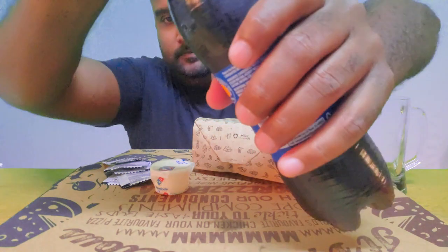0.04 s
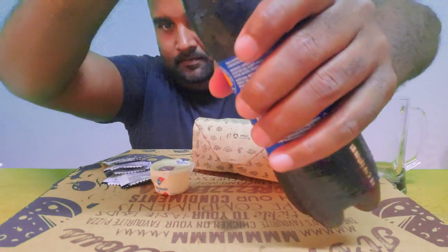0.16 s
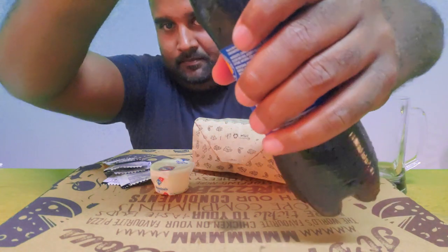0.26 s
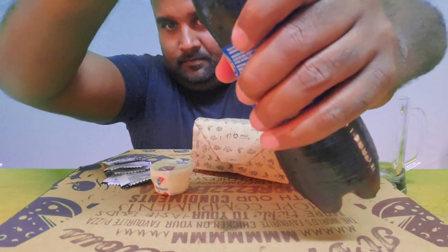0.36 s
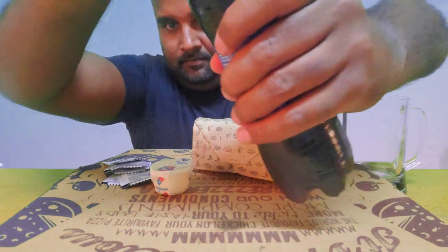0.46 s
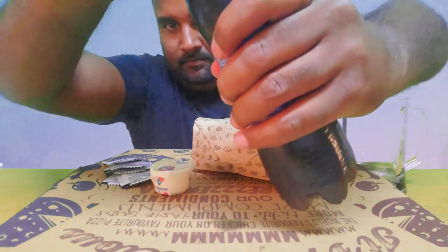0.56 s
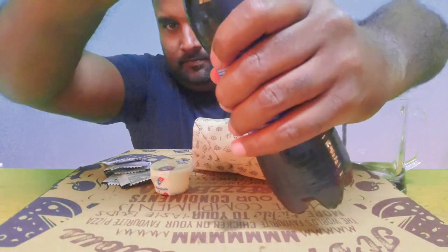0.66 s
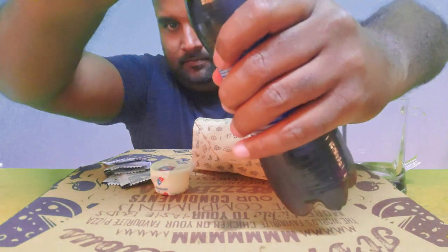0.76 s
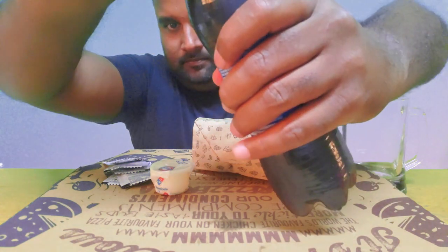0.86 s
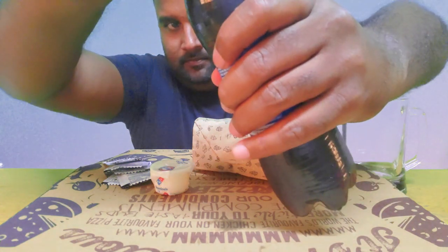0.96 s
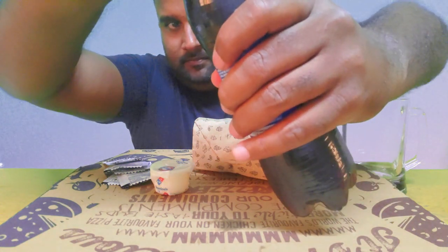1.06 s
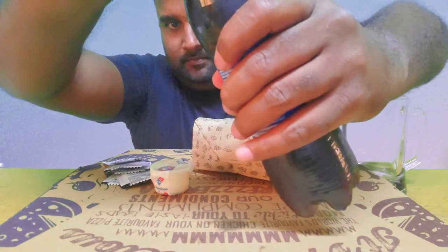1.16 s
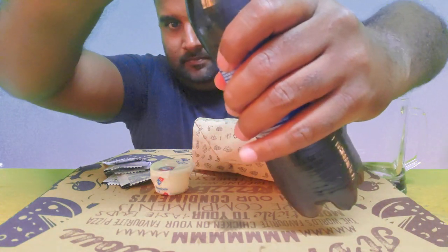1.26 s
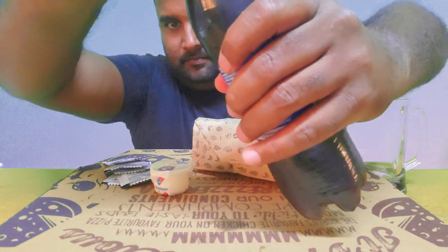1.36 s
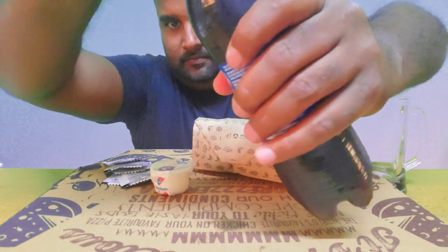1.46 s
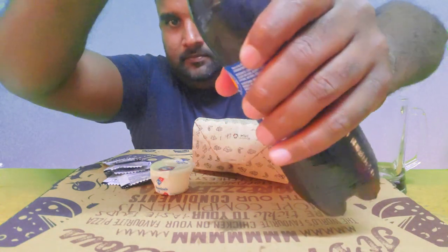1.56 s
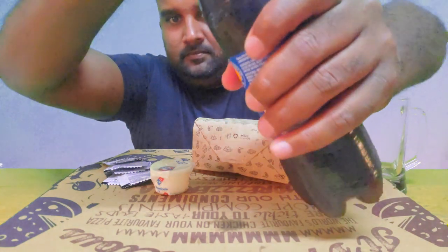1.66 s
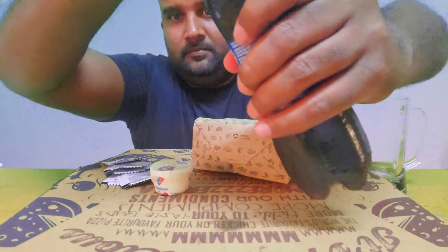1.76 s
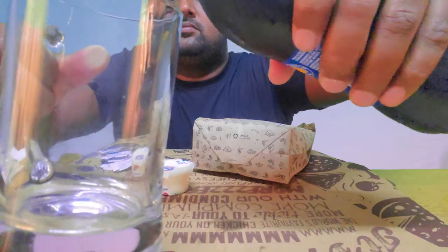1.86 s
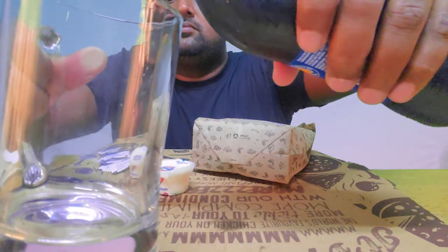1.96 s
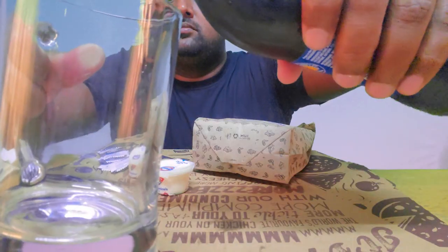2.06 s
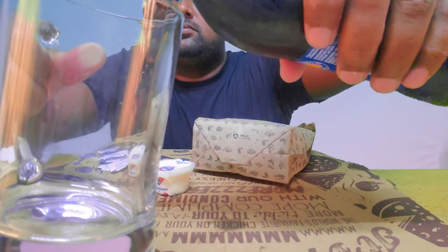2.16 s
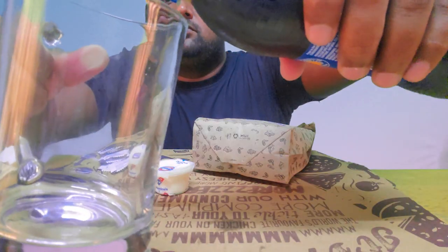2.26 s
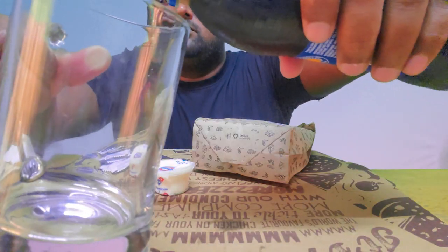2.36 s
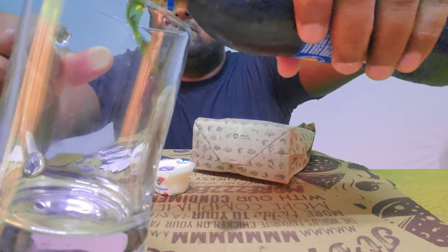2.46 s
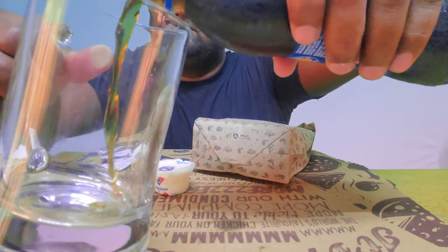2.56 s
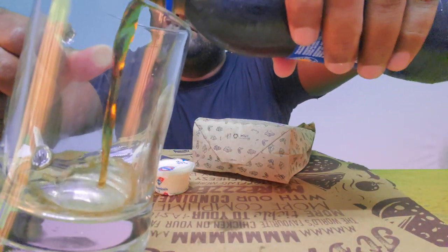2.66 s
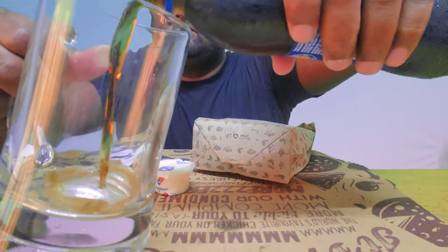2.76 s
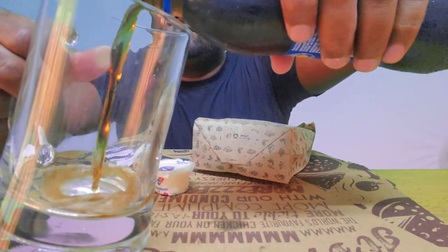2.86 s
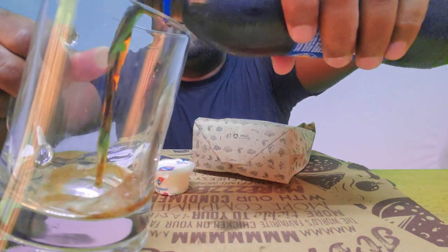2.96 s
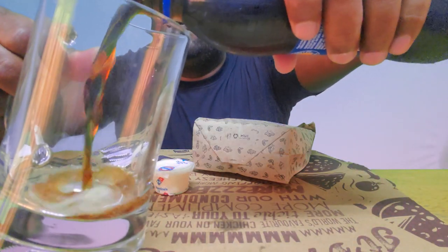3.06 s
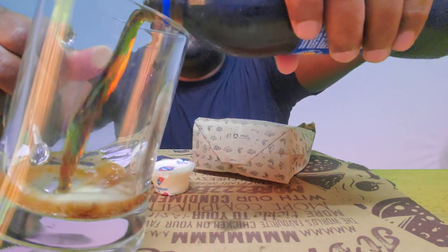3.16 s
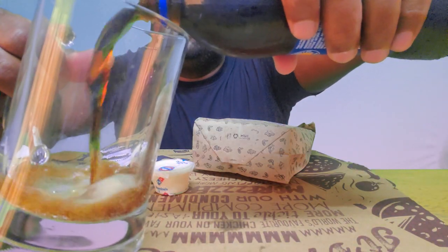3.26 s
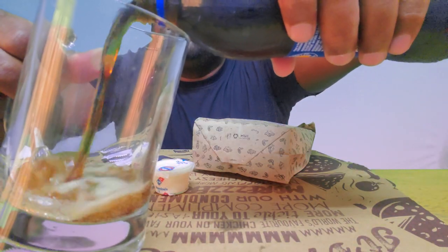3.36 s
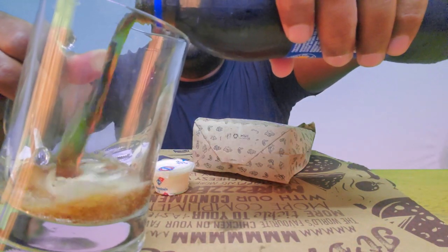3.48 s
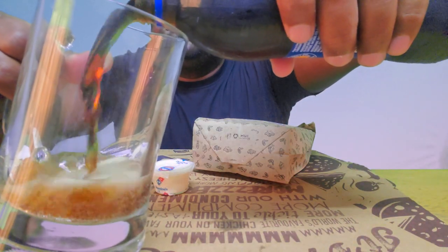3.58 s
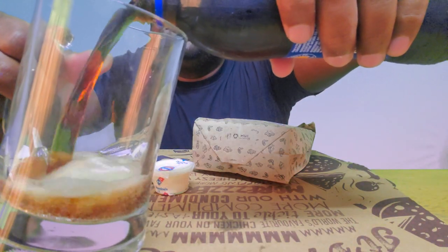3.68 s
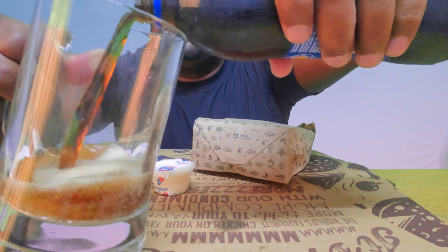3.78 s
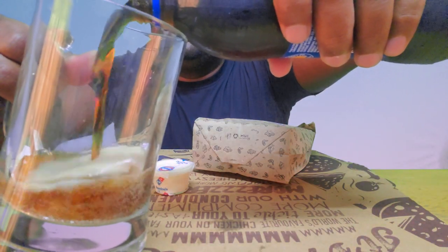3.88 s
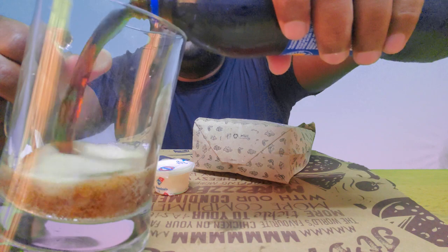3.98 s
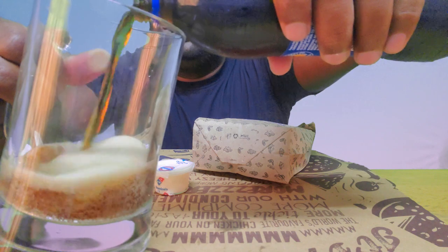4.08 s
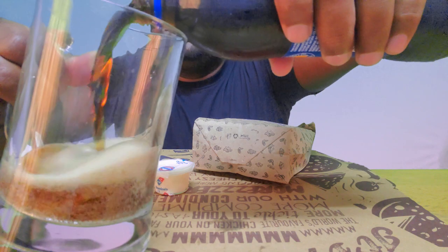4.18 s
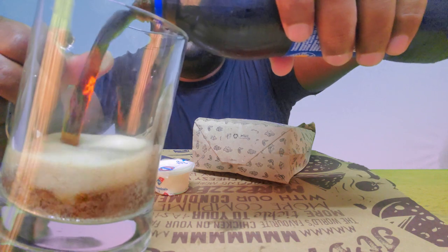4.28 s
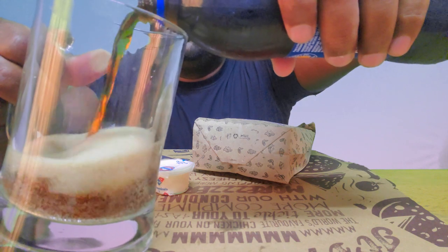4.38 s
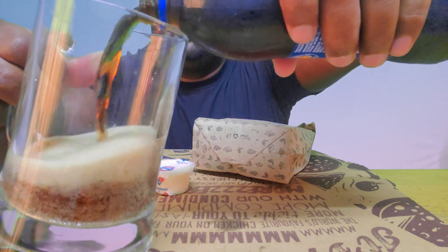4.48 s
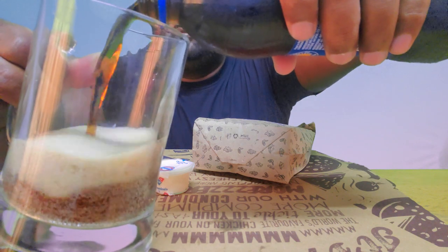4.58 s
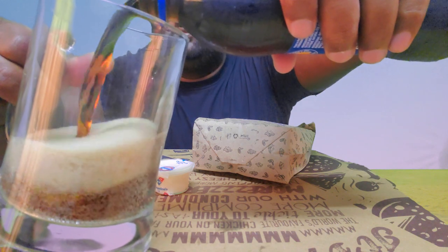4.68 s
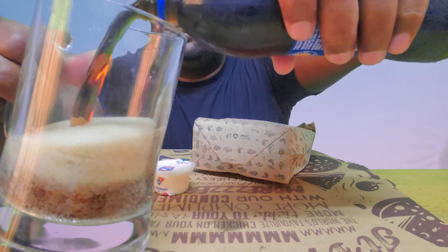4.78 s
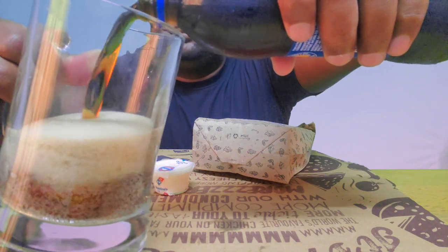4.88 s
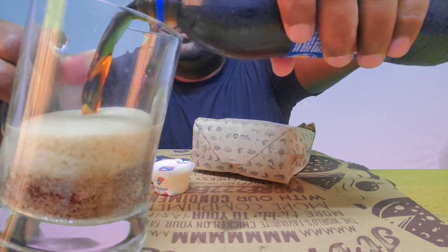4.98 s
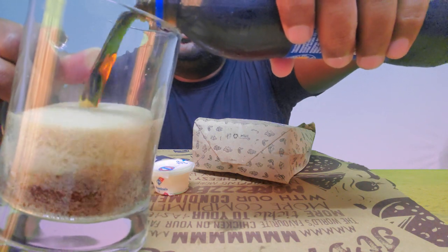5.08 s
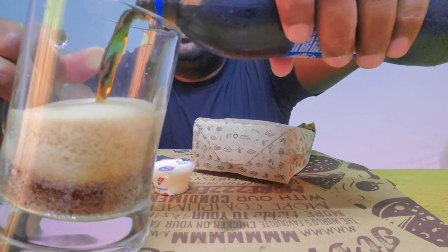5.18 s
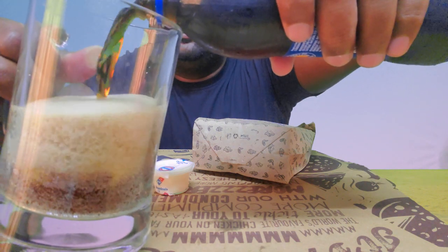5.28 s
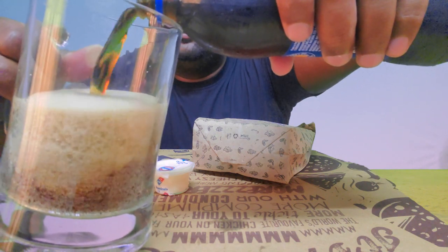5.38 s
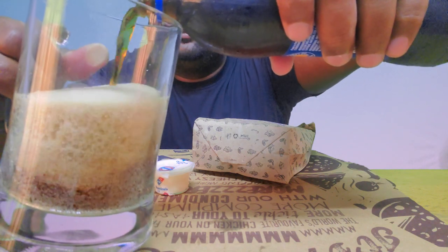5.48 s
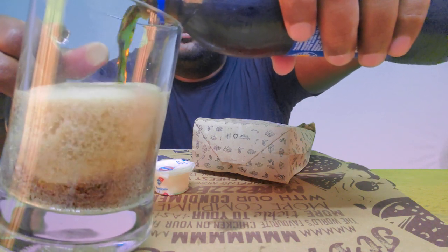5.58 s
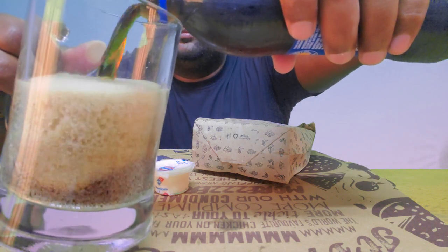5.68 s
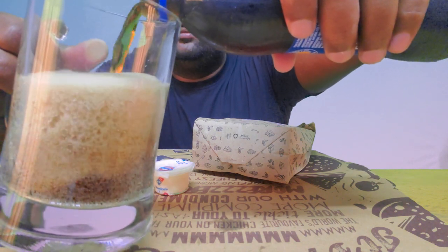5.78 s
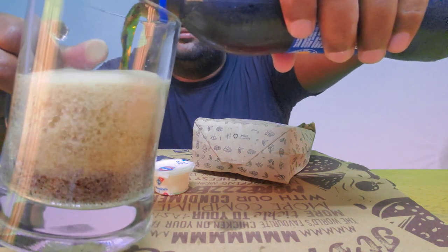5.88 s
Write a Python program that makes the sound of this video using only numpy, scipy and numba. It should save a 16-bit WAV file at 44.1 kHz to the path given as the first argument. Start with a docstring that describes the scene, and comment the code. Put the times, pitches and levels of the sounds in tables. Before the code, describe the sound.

A plastic bottle cap creaks and cracks open with a loud, sharp gas hiss, then fizzy drink glugs and foams into a glass mug.

```python
"""A plastic bottle is twisted open close to a two-port microphone: grainy rubbing and band-passed ticks of
the cap, then a jet of gas (coloured noise) that swells and fades. After a cut the drink is poured into a
glass mug: dense grains make fizz and churning, a moving band-pass is the air in the mug, decaying sines
are its ring under splashes, climbing sines are glugs and one low thump of the table. The foam grows
louder while the air's pitch climbs. Ventilation rumble and hum, both filtered noise, lie under it all."""
import sys
import numpy as np
from scipy import signal
from scipy.fft import rfft, irfft, next_fast_len
from scipy.io import wavfile
from scipy.ndimage import uniform_filter1d
from numba import njit

SR = 44100
rng = np.random.default_rng(int(sys.argv[2]) if len(sys.argv) > 2 else 0)


def generate_wav(sig):
    """Save sig (samples, or channels by samples) to the path in sys.argv[1] as 16-bit PCM at SR."""
    pcm = np.round(np.clip(np.atleast_2d(sig).T, -1, 1) * 32767).astype(np.int16)
    wavfile.write(sys.argv[1], SR, pcm)


N = 261513
T = np.arange(N) / SR


def undb(db):
    """dB to gain."""
    return 10 ** (np.asarray(db) / 20)


def along(table, hz):
    """Read a (freq_hz, value) table on a log frequency axis."""
    table_hz, value = np.transpose(table)
    return np.interp(np.log(np.maximum(hz, 1)), np.log(table_hz), value)


def columns(table):
    """Table columns interpolated at every sample, and a gate that is open within the table's times."""
    s, *cols = np.transpose(table)
    gate = (T >= s[0]) & (T <= s[-1])
    return [np.interp(T, s, c) for c in cols], gate


def shape(x, gain):
    """Filter by gain(hz) in the frequency domain."""
    size = next_fast_len(N + 8192)
    hz = np.arange(size // 2 + 1) * SR / size
    return irfft(rfft(x, size) * gain(hz), size)[..., :N]


def bumps(x, table):
    """Raise or lower narrow bands: [freq_hz, width_hz, gain_db]."""
    def gain(hz):
        return undb(sum(db * np.exp(-((hz - f) / w) ** 2) for f, w, db in table))
    return shape(x, gain)


def unit(x):
    """Scale to rms 1."""
    return x / np.sqrt(np.mean(x ** 2))


def walk(rate_hz):
    """Random levels held 1 / rate_hz s and slewed; spread near 1."""
    k = int(SR / rate_hz)
    steps = np.repeat(rng.standard_normal(N // k + 1), k)
    slewed = uniform_filter1d(uniform_filter1d(steps, k), k)
    return unit(slewed[:N])


def grains(scatter_db):
    """Two unrelated streams of tiny pops of uneven size, too dense to hear one by one."""
    sizes = np.minimum(rng.exponential(size=(2, N)), 6)
    return unit(rng.standard_normal((2, N)) * undb(scatter_db * sizes))


# part of the left-right contrast made by near reflections
ECHO_SHARE, ECHO_FROM_HZ, ECHO_RIPPLE_HZ = .7, 1200, 118.4


def pair(x, alike):
    """Left and right of the given likeness; their contrast is partly the same sound via near reflections."""
    turns_rad = np.cumsum(rng.standard_normal(400))

    def share(hz):
        return ECHO_SHARE * hz ** 2 / (hz ** 2 + ECHO_FROM_HZ ** 2)

    def like(hz):
        return np.clip(along(alike, hz), -.9, .99)

    def echo_gain(hz):
        # reflections turn the phase by a different angle in every narrow band
        angle_rad = 2 * np.interp(hz / ECHO_RIPPLE_HZ, np.arange(400), turns_rad)
        return np.sqrt(1 - like(hz)) * share(hz) * np.exp(1j * angle_rad)

    mid = shape(x[0], lambda hz: np.sqrt(1 + like(hz)))
    echo = shape(x[0], echo_gain)
    side = echo + shape(x[1], lambda hz: np.sqrt((1 - like(hz)) * (1 - share(hz) ** 2)))
    return np.array([mid + side, mid - side]) / np.sqrt(2)


def hiss(colour, alike, scatter_db, flicker_db, rate_hz):
    """Coloured grain noise whose level flickers."""
    x = shape(grains(scatter_db), lambda hz: undb(along(colour, hz)))
    return pair(unit(x), alike) * undb(flicker_db * walk(rate_hz))


@njit
def svf(x, hz, width_hz):
    """State-variable band-pass with a moving centre, gain 1 there."""
    y, band, low = np.empty(len(x)), 0., 0.
    for i in range(len(x)):
        g, k = np.tan(np.pi * hz[i] / SR), width_hz / hz[i]
        v = (band + g * (x[i] - low)) / (1 + g * (g + k))
        band, low, y[i] = 2 * v - band, low + 2 * g * v, k * v
    return y


def add(out, start_s, x):
    """Mix x into out from start_s."""
    i = int(start_s * SR)
    out[..., i:i + x.shape[-1]] += x[..., :N - i]


# ventilation spectrum: [freq_hz, relative_db]
ROOM_COLOUR = [(13, -37), (22, -3), (43, -1.5), (74, -7.5), (106, -2), (124, -13), (151, -6.5),
               (200, -14.5), (266, -22.5), (340, -20), (399, -31), (538, -31), (915, -59), (1500, -49.5),
               (1950, -75.5), (3300, -120)]
# left-right likeness of the room: [freq_hz, likeness (-1 to 1)]
ALIKE_ROOM = [(60, 1), (130, 0.84), (290, 0.7), (640, 0.25), (1410, -0.79), (3100, -0.84), (6820, 0.54),
              (15000, -0.06)]
# hum bands: [freq_hz, width_hz, rms_db]
HUM = [(50.7, 1.2, -58), (103.28, 2.3, -59.5), (140.65, 3.3, -69.5), (194.04, 14, -65.5), (355, 42, -79)]
ROOM_DB = -53.5


def room():
    """Ventilation rumble with a wavering mains hum and a few other narrow hums: noise through narrow
    resonances."""
    out = undb(ROOM_DB) * hiss(ROOM_COLOUR, ALIKE_ROOM, .1, 0.82, 7.4)
    for hz, width_hz, rms_db in HUM:
        centre_hz = np.full(N, 1. * hz)
        narrow = svf(rng.standard_normal(N), centre_hz, 1. * width_hz)
        out = out + undb(rms_db) * unit(svf(narrow, centre_hz, 2. * width_hz))
    return out


def stroke(start_s, level_db, rise_s, hold_s, fade_db_per_s):
    """Envelope of one rub: rise, hold, then an even fade in dB."""
    fading_s = np.maximum(T - start_s - rise_s - hold_s, 0)
    return np.clip((T - start_s) / rise_s, 0, 1) ** 2 * undb(level_db - fade_db_per_s * fading_s)


# rubbing spectrum: [freq_hz, relative_db]
RUB_COLOUR = [(530, -40), (900, -26), (1080, -28), (1780, -2), (2180, -9.5), (3200, 3.5), (3970, -5),
              (5160, -2.5), (6100, -21.5), (7390, -23), (9850, -3), (11500, -10), (12800, -22),
              (15700, -19)]
# left-right likeness at the cap: [freq_hz, likeness (-1 to 1)]
ALIKE_CAP = [(60, 0.68), (130, 0.69), (290, 0.2), (640, -0.009), (1410, 0.044), (3100, 0.099),
             (6820, -0.21), (15000, 0.14)]
# strokes of cap and fingers on plastic:
# [start_s, level_db, rise_s, hold_s, fade_db_per_s, low_band_db, high_band_db]
STROKES = [(0.051, -53, 0.019, 0.071, 280, 2, 0.5), (.303, -56, 0.0042, 0.0051, 294, -16, -7),
           (1.426, -54.5, 0.0046, 0.0037, 320, 11, 5.5), (1.448, -50.5, 0.046, 0.024, 260, -2, 0),
           (1.531, -65, 0.032, 0.078, 148, 3, -2), (1.725, -60.5, 0.066, 0.089, 100, -17, -14)]
# cap thread ticks: [start_s, peak_db, brightness_db]
TICKS = [(0.2554, -60, 15), (0.3067, -49, -30), (0.318, -61, -16), (0.4558, -34, -14), (1.432, -39, -7.5),
         (1.494, -30.5, 3), (1.8514, -51.5, 3)]
# cap bands excited by each tick: [freq_hz, width_hz, level_db]
CAP_BANDS = [(1910, 680, -1), (3550, 900, 5), (5030, 1100, -2.5), (10000, 6900, -3.5)]
CRACK_S = .454  # the seal cracks
POP_HZ, POP_DB, POP_T60_S = 650, -43, 0.027  # the bottle wall pops softly


def cap():
    """Grainy rubbing, short ticks with a little tail from the table and walls, and the pop of the seal."""
    rub = hiss(RUB_COLOUR, ALIKE_CAP, 2.23, 1.3, 60.3)
    low = shape(rub, lambda hz: 1 / (1 + (hz / 2300) ** 12))
    high = shape(rub, lambda hz: 1 / (1 + (7000 / (hz + 1)) ** 12))
    out = np.zeros((2, N))
    for *envelope, low_db, high_db in STROKES:
        tinted = rub + (undb(low_db) - 1) * low + (undb(high_db) - 1) * high
        out += stroke(*envelope) * tinted
    t = T[:4000]
    for start_s, peak_db, bright_db in TICKS:
        snap, *tail = rng.standard_normal((3, len(t)))
        push = (1 + .4 * snap) * np.exp(-t / 0.00004)
        push = push + undb(-25.5) * np.array(tail) * np.exp(-t / .012)
        tick = 0
        for hz, width_hz, db in CAP_BANDS:
            edges_hz = [hz - width_hz / 2, hz + width_hz / 2]
            band = signal.butter(2, edges_hz, "band", fs=SR, output="sos")
            tick = tick + undb(db + bright_db * (hz > 6000)) * signal.sosfilt(band, push)
        add(out, start_s, undb(peak_db) * tick / np.abs(tick).max())
    pop = np.sin(2 * np.pi * POP_HZ * t) * 1000. ** (-t / POP_T60_S)
    add(out, CRACK_S, undb(POP_DB) * pop)
    return out


# level slope of each band in the fade: [freq_hz, loss_db_per_db]
JET_FADE = [(300, 1), (700, 1.5), (1500, 0.91), (2500, 0.98), (3800, 0.97), (5000, 1.09), (6000, 1),
            (7000, 1), (8200, 1.14), (9500, 0.89), (12000, 0.79), (13000, 0.9), (15500, 0.83)]
# lower edge of the hiss at full blast; it climbs an octave per JET_EDGE_DB of fade
JET_EDGE_HZ, JET_EDGE_DB = 460, 18


def swell(x, level_db, slopes):
    """Play x at level_db, each band following the fade with its own slope above a climbing lower edge."""
    hz, s, z = signal.stft(x * undb(level_db), SR, nperseg=256)
    after_peak = s > T[level_db.argmax()]  # only the fade thins out
    drop_db = (level_db.max() - np.interp(s, T, level_db)) * after_peak
    edge_hz = JET_EDGE_HZ * 2 ** (drop_db / JET_EDGE_DB)
    high_pass = 1 / np.sqrt(1 + (edge_hz / (hz[:, None] + 1)) ** 8)
    gain = undb(-np.outer(along(slopes, hz) - 1, drop_db)) * high_pass
    return signal.istft(z * gain, SR, nperseg=256)[1][:, :N]


# gas spectrum: [freq_hz, relative_db]
JET_COLOUR = [(120, -49.5), (200, -22), (288, -32.5), (632, -25), (1110, -24.5), (1600, -17), (2350, -15.5),
              (2980, -6), (3780, -6), (4350, -2), (5100, -1.5), (5550, -5.5), (6190, -6), (7990, -4.5),
              (10100, -2), (15700, -10.5)]
# peaks and dips round the bottle neck: [freq_hz, width_hz, gain_db]
NECK = [(1930, 370, 2.5), (3322, 630, 2), (3896, 350, -4.5), (4860, 630, 1.5), (5648, 300, -4.5),
        (6400, 310, 2), (7590, 660, -3)]
# last gas past the loosened thread: [time_s, level_db]
SEEP = [(1.15, -63), (1.3, -62.5), (1.43, -66), (1.5, -60), (1.7, -56), (1.87, -56.5)]
# seep spectrum: [freq_hz, relative_db]
SEEP_COLOUR = [(3240, -26), (5500, -9), (5850, -17.5), (6640, -7.5), (7320, -10), (9150, 0), (10700, -8.5),
               (12100, -6), (12800, -17), (15700, -17)]
LEAK_DB = -41.5
BLAST_S, SWELL_S, SWELL_POWER, BLAST_DB = 0.4643, 0.027, 1.3, -6.5
FADE_FROM_S, FADE_DB_PER_S, FADE_BEND_DB_PER_S2 = 0.56, 69, 11.5


def jet():
    """Turbulent gas; as the pressure falls the lows die faster than the highs, then a thin seep remains."""
    blast = 1 - np.exp(-(np.maximum(T - BLAST_S, 0) / SWELL_S) ** SWELL_POWER)
    late_s = np.maximum(T - FADE_FROM_S, 0)
    level_db = 20 * np.log10(undb(LEAK_DB) + undb(BLAST_DB) * blast)
    level_db = level_db - FADE_DB_PER_S * late_s - FADE_BEND_DB_PER_S2 * late_s ** 2
    (seep_db,), seeping = columns(SEEP)
    seep = undb(seep_db) * seeping * hiss(SEEP_COLOUR, ALIKE_CAP, 2.4, 1.1, 13.13)
    gas = bumps(hiss(JET_COLOUR, ALIKE_CAP, 1.5, 0.34, 40), NECK)
    return swell(gas * (T > CRACK_S), level_db, JET_FADE) + seep


# air column above the drink, shrinking as the mug fills
AIR_M, AIR_LEAST_M, FILL_FROM_S, FILL_M_PER_S = .131, 0.0864, 3.32, 0.025


def air_pitch(s):
    """Quarter-wave pitch in Hz of the air above the drink."""
    air_m = AIR_M - FILL_M_PER_S * np.maximum(s - FILL_FROM_S, 0)
    return 343 / 4 / np.maximum(air_m, AIR_LEAST_M)  # speed of sound 343 m/s


# pouring levels before gushes: [time_s, foam_fizz_db, churn_db, mug_air_db]
POUR = [(2.6, -92, -93, -90), (3.1, -76.5, -110, -92), (3.5, -68.5, -87, -77), (3.64, -62.5, -87, -61.5),
        (3.83, -59, -97, -71.5), (4.1, -60.5, -85.5, -74), (4.4, -55.5, -83, -69.5),
        (4.6, -54.5, -68, -65.5), (4.8, -52.5, -60.5, -58.5), (4.89, -54, -54.5, -51),
        (5.24, -54, -52, -56), (5.34, -54.5, -48.5, -72), (5.67, -54, -46.5, -76), (5.84, -54.5, -44, -79),
        (5.93, -53, -47, -77)]
# the stream gushes and the foam flares up: [peak_s, extra_level_db]
GUSHES = [(2.8, 8), (3.17, 12), (3.295, 13.5), (3.445, 5.5), (3.77, -0.5), (4.01, 4.5), (4.2, 6), (4.5, 3),
          (4.67, 1.5), (4.9, 2), (5.02, 1), (5.24, 1.5)]
# foam spectrum: [freq_hz, relative_db]
FIZZ_COLOUR = [(1120, -22), (1900, -16), (1990, -23), (2250, -23), (2450, -10), (2830, -1), (3260, -5),
               (4030, -12.5), (4640, -8), (5630, -15.5), (6260, -10), (7090, -14), (9320, -11.5),
               (10100, -15.5), (15700, -23)]
# peaks and dips inside the mug: [freq_hz, width_hz, gain_db]
RIM = [(2270, 160, 1), (2800, 160, 1.5), (3600, 140, 5), (4100, 190, -1.5), (4850, 260, 3), (7160, 260, -4),
       (9400, 310, 3)]
# churning spectrum: [freq_hz, relative_db]
CHURN_COLOUR = [(500, -35), (850, -11), (900, -25), (981, 1.5), (1360, 8), (1590, 1.5), (1730, -1),
                (1910, -7.5), (2100, -27), (2730, -36), (4620, -120)]
# left-right likeness at the mug: [freq_hz, likeness (-1 to 1)]
ALIKE_MUG = [(60, 0.94), (130, 0.89), (290, 0.61), (640, 0.29), (1410, 0.66), (3100, 0.46), (6820, 0.038),
             (15000, 0.09)]
# foam thickening, one row each: [time_s]; [coarse_gain_db]
FOAM_S = (3.18, 3.9, 4.83)
COARSE_DB = (-19, -6.5, 1.7)
GUSH_RISE_S, GUSH_FALL_S = 0.035, 0.063


def pour():
    """Foam pops on top, bubbles churn below, and the shrinking air column colours the stream."""
    (fizz_db, churn_db, air_db), pouring = columns(POUR)
    gush_db = np.zeros(N)
    for peak_s, extra_db in GUSHES:
        width_s = np.where(T < peak_s, GUSH_RISE_S, GUSH_FALL_S)
        gush_db += extra_db * np.exp(-((T - peak_s) / width_s) ** 2)
    fizz = bumps(hiss(FIZZ_COLOUR, ALIKE_MUG, 2.37, 0.44, 25), RIM)
    # small bright bubbles come first, larger ones join as the foam thickens
    coarse = shape(fizz, lambda hz: 1 / (1 + (hz / 4650) ** 20))
    coarse_gain = undb(np.interp(T, FOAM_S, COARSE_DB))
    fizz = undb(fizz_db) * (fizz - coarse + coarse_gain * coarse)
    churn = undb(churn_db) * hiss(CHURN_COLOUR, ALIKE_MUG, 2.1, 1.17, 9)
    air_hz = air_pitch(T)
    air = np.array([svf(svf(x, air_hz, 150.0), air_hz, 216.0) for x in grains(3.3)])
    air = undb(air_db + 2.8 * walk(18)) * pair(unit(air), ALIKE_MUG)
    return ((fizz + churn) * undb(gush_db) + air) * pouring


# the stream slaps the pool: [start_s, ring_peak_db, brightness_db, wash_rel_ring_db]
SPLASHES = [(2.766, -73, -8, -14), (3.124, -68, -9, 3.5), (3.283, -51.5, -9.5, -7.5),
            (3.305, -55, -16, -2.5), (3.427, -51.5, -19, 1.5), (3.494, -56.5, -9.5, -13),
            (3.570, -46, -3, -16), (3.5835, -30.5, 2.5, -17.5), (3.629, -35.5, -8, -25),
            (3.634, -34, -4, -26), (3.664, -50, -2, -18.5), (3.846, -56.5, 2.5, -11),
            (4.002, -56.5, 11, -11), (4.194, -46, -9, -9.5), (4.334, -52, -10, -27)]
# mug modes, before random scatter: [freq_hz, level_db, t60_s]
MUG = [(496, 4, 0.025), (677, 5, 0.069), (800, -31, .02), (1330, -4.5, 0.011), (1802, -0.5, 0.01),
       (2980, -18, 0.01)]
# droplet wash spectrum: [freq_hz, relative_db]
WASH_COLOUR = [(150, -56), (250, -19), (340, -22), (451, -6.5), (558, -8), (682, -9), (833, -38),
               (1130, -19), (1320, -28), (1730, -16), (4200, -40), (5460, -73), (9240, -120)]
MUG_AT_S = 3.6  # time at which the MUG air mode holds; it climbs with the fill


def splashes():
    """Each slap rings the mug; a short wash of droplets follows."""
    out, t = np.zeros((2, N)), T[:8000]
    drops = hiss(WASH_COLOUR, ALIKE_MUG, 2.3, 1.2, 50)
    dull = shape(drops, lambda hz: 1 / (1 + (hz / 900) ** 8))
    for start_s, peak_db, bright_db, wash_db in SPLASHES:
        ring, rise = 0, air_pitch(start_s) / air_pitch(MUG_AT_S)
        scatter = rng.standard_normal((len(MUG), 2))
        for (hz, db, t60_s), (detune, uneven) in zip(MUG, scatter):
            is_air = 600 < hz < 750
            pitch_hz = hz * (1 + .012 * detune) * (rise if is_air else 1)
            mode = np.sin(2 * np.pi * pitch_hz * t) * 1000. ** (-t / t60_s)
            ring = ring + undb(db + 0.27 * uneven + bright_db * (hz > 1100)) * mode
        ring = ring * (1 - np.exp(-t / 0.00079))  # water gives a soft push
        i = int(start_s * SR)
        low, full = dull[:, i:i + len(t)], drops[:, i:i + len(t)]
        wash = low + undb(bright_db) * (full - low)
        wash = wash * np.exp(-t / 0.038) * (1 - np.exp(-t / 0.0044))
        add(out, start_s, undb(peak_db) * (ring / np.abs(ring).max() + undb(wash_db) * wash))
    return out


# air pockets swallowed by bottle neck and pool; the 50 Hz row is a low thump of the table:
# [peak_s, peak_db, pitch_at_peak_hz, climb_octaves_per_s, swell_s, fade_s]
GLUGS_AND_THUMP = [(3.13, -49.5, 229, 4, 0.0066, 0.0054), (3.284, -45.5, 200, 4.5, 0.0019, 0.011),
                   (3.433, -40.5, 269, 5.4, 0.0014, 0.011), (3.455, -41.5, 440.7, 24, 0.017, 0.0078),
                   (3.885, -33.5, 145.5, 12.3, 0.0067, 0.015), (4.0, -40.5, 50.2, 1, 0.089, 0.044),
                   (4.188, -20.5, 146, 20.1, 0.018, 0.011), (4.218, -34, 193, 6.9, 0.012, 0.016),
                   (4.443, -26, 155, 46, 0.011, 0.0083), (4.466, -31, 104.7, 2.2, 0.0053, 0.0059),
                   (4.497, -38, 239.8, 0.67, 0.016, 0.024), (4.535, -45.5, 243, 1.12, 0.017, 0.015)]
LEAD_S = .12  # each sound starts this long before its peak


def glugs_and_thump():
    """Closing air pockets, and one low table thump: wobbling near sines that swell, climb and fade."""
    out, wobble, shake = np.zeros(N), walk(90), walk(130)
    t = T[:int(.3 * SR)] - LEAD_S
    for peak_s, peak_db, hz, climb, swell_s, fade_s in GLUGS_AND_THUMP:
        span = slice(int(peak_s * SR), int(peak_s * SR) + len(t))
        pitch_hz = hz * 2 ** (np.clip(climb * t, -1, .6) + 0.06 * wobble[span])
        rising = np.exp(-(t / swell_s) ** 2)
        fading = np.exp(-(np.abs(t) / fade_s) ** 1.03)
        body = np.where(t < 0, rising, fading)
        tone = np.sin(2 * np.pi * np.cumsum(pitch_hz) / SR)
        add(out, peak_s - LEAD_S, undb(peak_db + 1.0 * shake[span]) * body * tone)
    return out


CUT_S = 1.853


def scene():
    """The opening ends at the cut; the room runs through."""
    opening = (cap() + jet()) * (T < CUT_S)
    pouring = pour() + splashes() + glugs_and_thump()
    return room() + opening + pouring


# port colour: [freq_hz, left_minus_right_db]
PORTS = [(60, 0.5), (200, -3.5), (380, -7), (700, -4), (1290, -5), (2380, -3), (3300, -1), (4400, -7),
         (6000, -5), (8100, 0.5), (11000, 2.5), (13500, -10), (15500, -7.5)]
# microphone hiss spectrum: [freq_hz, relative_db]
SELF_NOISE = [(500, -8.5), (800, 2), (2000, 0.5), (4000, -2), (6300, -7.5), (8000, -8), (10000, -3.5),
              (15700, -5.5)]
SELF_DB, TOP_HZ = -75, 15750


def record(dry):
    """Each port has its own colour and faint hiss, deep bass is lost; the loudest peaks clip, the top is cut."""
    def port_gain(hz):
        bass_cut = 1 / np.sqrt(1 + (36 / (hz + 1)) ** 8)
        return undb(np.outer([.5, -.5], along(PORTS, hz))) * bass_cut

    noise = shape(rng.standard_normal((2, N)), lambda hz: undb(along(SELF_NOISE, hz)))
    ports = shape(dry, port_gain) + undb(SELF_DB) * unit(noise)
    top_cut = signal.ellip(10, .2, 70, TOP_HZ, fs=SR, output="sos")
    return signal.sosfilt(top_cut, np.clip(ports, -.95, .95))


dry = scene()
out = record(dry)
generate_wav(out)
```